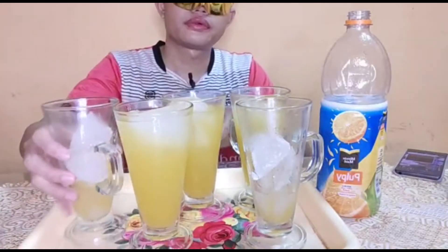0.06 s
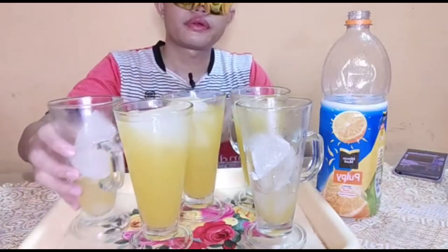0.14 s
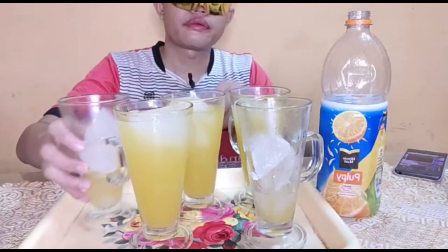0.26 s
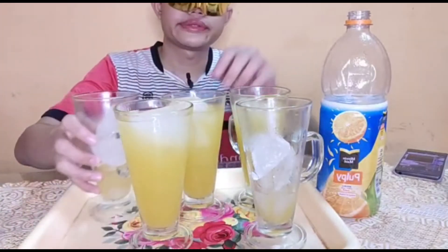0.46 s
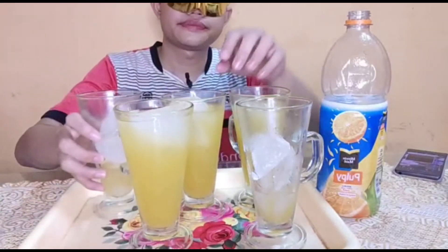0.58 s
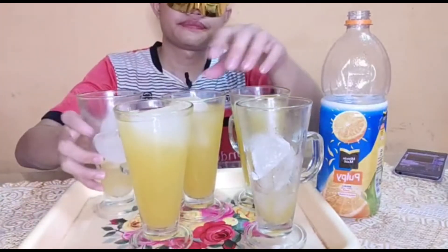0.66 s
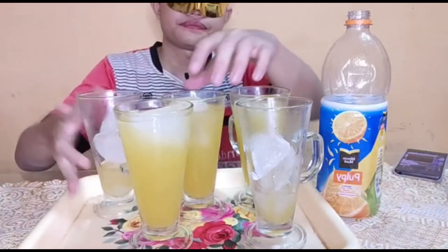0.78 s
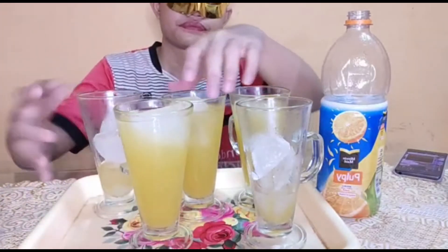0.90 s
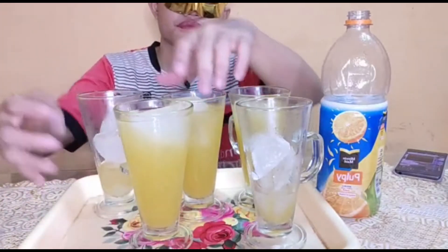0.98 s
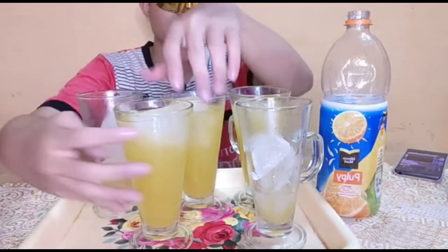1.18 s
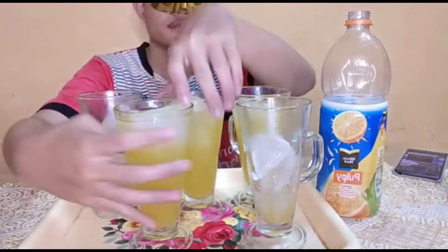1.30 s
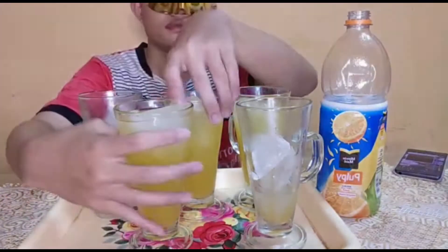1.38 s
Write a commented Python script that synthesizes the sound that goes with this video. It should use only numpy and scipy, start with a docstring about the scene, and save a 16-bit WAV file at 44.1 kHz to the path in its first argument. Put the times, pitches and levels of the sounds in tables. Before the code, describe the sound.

A glass mug of ice slides and clinks against another glass, then ice taps softly.

```python
"""A glass mug of ice, slid across a tray by hand, clinks and chatters against a neighbouring glass.
Each contact rings both, the held mug short and the free glass long, and shakes the tray beneath them.
The ice settles in small taps and pings, something light knocks, and sleeves rustle and click close by
as the arms move. Behind it all is a small, quiet room with a faint rumble and hiss."""
import sys
import numpy as np
from scipy import signal
from scipy.fft import rfft, irfft, next_fast_len
from scipy.io import wavfile
from scipy.ndimage import map_coordinates

SR = 44100
rng = np.random.default_rng(int(sys.argv[2]) if len(sys.argv) > 2 else 0)


def wav_out(sig):
    """Save sig, one row per channel (or a flat mono array), as 16-bit PCM at SR to the path in sys.argv[1]."""
    wavfile.write(sys.argv[1], SR, np.round(np.clip(np.atleast_2d(sig).T, -1, 1) * 32767).astype(np.int16))


N = 63945
T = np.arange(N) / SR

# The mug chatters on the glass. Each row: start in seconds, ring level in dB, clack level in dB.
CHATTER = [(0.2312, -11, -14), (0.242, -13, -11), (0.2474, -21, -19), (0.2534, -22.5, -16.5),
           (0.2585, -27.5, -25.5), (0.2573, -25.5, -38), (0.259, -38.5, -33.5), (0.264, -34.5, -31.5),
           (0.268, -36, -29), (0.2802, -56.5, -40)]
# What rings. Each row: pitch in Hz, relative level in dB, time to die by 60 dB (t60) in seconds.
MUG_MODES = [(911.6, -21.5, 0.069), (1512, -17.5, 0.06), (2664, 3, 0.033), (2616, -20.5, 0.18),
             (4393, -13.5, 0.078), (5435, -24.5, 0.031), (7094, -15, 0.016), (9220, -29.5, .04),
             (9820, -25, 0.053)]  # damped by the hand
GLASS_MODES = [(951, -31, .27), (1532, -34, .24), (2351, -30, .2), (2429, -31, .28), (2661, -17, .19),
               (2717, -22, .24), (4415, -25, .3), (4432, -31, .28), (5480, -40, .26), (6158, -38, .3),
               (7140, -42, .2), (9135, -42, .22), (9798, -43, .18), (9884, -45, .2), (14850, -56, .2)]  # standing free
TRAY_LOW_MODES = [(660, -35, .1), (752, -31, .14), (897, -28, .12), (1030, -32, .1), (1345, -31, .12)]  # shaken through the feet of the glasses
PLASTIC_MODES = [(1314, 0.5, 0.017), (1940, -10, 0.033), (2368, -0.5, 0.014), (2920, -12.5, 0.024)]
# Ice hits the mug. Each row: start in seconds, ring in dB, pitch in Hz, t60 in seconds, crack in dB.
ICE_TAPS = [(0.1994, -36, 2205, 0.015, -50), (0.5543, -44.5, 2220, 0.017, -55),
            (.6049, -37, 2130, 0.022, -51), (.6305, -37, 2190, 0.016, -51),
            (.6328, -42.5, 2130, 0.035, -52.5), (0.654, -71, 1770, 0.02, -46.5),
            (0.665, -52, 1660, .02, -49.5), (0.902, -54.5, 1873, 0.027, -60.5)]
# Lone notes. Each row: start in seconds, level in dB, pitch in Hz, t60 in seconds.
ICE_PINGS = [(.529, -63, 6100, 0.098), (.53, -72, 10120, .07), (.6049, -58.5, 2173, 0.38),
             (.633, -59.5, 5550, 0.046), (.6658, -62, 4380, .07), (1.1268, -47.5, 10060, 0.014),
             (1.1795, -48, 10020, 0.019)]  # tiny glassy after-rings
RESTING_NOTES = [(0.403, -51, 64, 0.16), (0.544, -60, 503.6, 1.0)]  # faint and low, as the mug comes to rest
# A plastic knock and its rebounds. Each row: start in seconds, ring level in dB, snap level in dB.
KNOCK_BOUNCES = [(1.0336, -35, -32), (1.0372, -51, -31), (1.0441, -49.5, -25)]
# Small clicks. Each row: start in seconds, level in dB, centre in Hz, half-width in octaves, t60 in seconds.
HANDLING_CLICKS = [(0.0295, -40.5, 1420, 0.48, 0.015), (0.0368, -40, 830, 0.55, 0.026),
                   (.0565, -46, 1500, 1.3, 0.014), (0.0695, -38, 889, .5, .012),
                   (.1195, -48, 4000, 1.5, 0.011), (0.402, -50, 1500, 1, .04), (.511, -55, 1180, .5, 0.059),
                   (0.5555, -47, 3300, 0.44, 0.014), (1.074, -55, 12080, 0.34, 0.018),
                   (1.0458, -44, 4500, 1, 0.025), (1.1245, -49, 2600, 0.4, 0.016),
                   (1.1268, -45, 7500, 0.44, .012), (1.2355, -49, 6900, 1, 0.011),
                   (1.245, -46.5, 2800, 0.62, .018), (1.2805, -43, 2250, .7, .025),
                   (1.331, -43, 1970, 0.28, 0.014)]
# Fader moves for the friction. Each row: time in seconds, level in dB.
SLIDE_FADER = [(0, -70), (.03, -56.5), (.08, -55), (.1, -47.5), (.14, -50.5), (.22, -51), (.32, -52.5),
               (.41, -56), (.46, -69), (.5, -71.5)]
SLEEVE_FADER = [(1.0, -74.5), (1.06, -63.5), (1.2, -66), (1.235, -58.5), (1.283, -51.5), (1.31, -56),
                (1.335, -52), (1.36, -60.5), (1.41, -59.5), (1.45, -63)]
# The tone of each hit and noise bed. Each row: frequency in Hz, relative level in dB.
CLACK_EQ = [(100, -19.5), (400, -13.5), (800, -9), (1500, 0), (2400, 9), (3000, -14.5), (3500, -14.5),
            (4200, 6), (5200, -18), (6800, -4.5), (8400, -26.5), (10000, -15.5), (12300, -19.5),
            (14000, -44.5)]
TRAY_EQ = [(100, -22), (400, -13), (850, 3.5), (1150, -1.5), (1600, 0), (2600, -4.5), (3500, -9.5),
           (7000, -15), (8500, -26.5), (10500, -28), (14000, -36.5)]
SLIDE_EQ = [(150, -0.5), (320, -4.5), (600, 1.5), (1100, -1.5), (1900, 0.5), (3200, -8), (5500, -17),
            (8400, -24.5), (15500, -26)]
CRACK_EQ = [(200, -5), (700, 13), (2000, -2.5), (3500, -2), (6000, -3.5), (8000, -10.5), (10000, -12.5),
            (15000, -32.5)]
SNAP_EQ = [(200, -16.5), (800, 2), (1400, -1), (3000, 0), (7000, -2), (12000, -2), (15500, -16)]
SLEEVE_EQ = [(200, -20), (700, -0.5), (1200, -1.5), (1900, 4.5), (3200, -9), (5000, -10.5), (8000, -20.5),
             (11500, -13.5), (14000, -19.5), (15600, -27.5)]
ROOM_TONE_EQ = [(10, -1), (22, 4.5), (40, -10), (76, -11.5), (120, -12), (180, -11), (240, -20), (360, -20),
                (490, -18), (680, -24), (1200, -31.5), (2000, -46), (2700, -45.5), (6500, -41.5),
                (7800, -33), (9000, -47.5), (15500, -48)]
# The room's decay. Each row: frequency in Hz, t60 in seconds.
ROOM_DECAY = [(200, 1), (1500, 0.22), (4000, 0.38), (12000, 0.38)]

CLACK_DB, GRIT_DB, TRAY_RATTLE_DB = 8, -7.5, -22  # trims on the clack level
WAVER_RAD, WAVER_PER_S = 0.28, 45
ATTACK_S, GRAIN_WIDTH_HZ = 0.0004, 2500
REVERB_DB, REVERB_BUILD_S = -17, 0.0071
ROOM_TONE_DB, TOP_HZ = -53.5, 15750


def clink():
    """Each contact rings both glasses, gives a hard gritty clack, and shakes the tray."""
    rings = [(s, db) for s, db, _ in CHATTER]
    clacks = [(s, db) for s, _, db in CHATTER]
    clack = amp(CLACK_DB) * struck(clacks, CLACK_EQ)
    grit = amp(GRIT_DB) * noise(CLACK_EQ) * topped_up(clacks, t60=0.01)
    tray_body = ring(clacks, TRAY_LOW_MODES)
    tray_rattle = amp(TRAY_RATTLE_DB) * noise(TRAY_EQ) * topped_up(clacks, t60=0.22)
    return ring(rings, MUG_MODES + GLASS_MODES) + clack + grit + tray_body + tray_rattle


def slide():
    """The mug's base scrapes over the tray."""
    return rub(SLIDE_FADER, SLIDE_EQ, grain_db=3.0, grains_per_s=330)


def ice():
    """Ice taps the mug, each tap a tiny crack and one short note, with glassy pings on top."""
    taps = notes(row[:4] for row in ICE_TAPS)
    crack_envelope = sum(amp(db) * fade(s, t60=0.02) for s, *_, db in ICE_TAPS)
    return taps + crack_envelope * noise(CRACK_EQ) + notes(ICE_PINGS)


def knock():
    """Light, hollow plastic bounces, with a crisp snap at each contact."""
    body = ring([(s, db) for s, db, _ in KNOCK_BOUNCES], PLASTIC_MODES)
    snap = struck([(s, db) for s, _, db in KNOCK_BOUNCES], SNAP_EQ)
    return body + snap


def clicks():
    """Dry clicks of handling, each a noise burst in its own broad resonance."""
    out = np.zeros(N)
    for s, db, hz, width, t60 in HANDLING_CLICKS:
        band = filtered(rng.standard_normal(N), lambda f: 1 / (1 + (np.log2((f + 1) / hz) / width) ** 2))
        out += amp(db) * fade(s, t60) * unit(band)
    return out


def sleeves():
    """Cloth rubs and rustles as the arms move."""
    return rub(SLEEVE_FADER, SLEEVE_EQ, grain_db=4.5, grains_per_s=360)


def reverb(x):
    """The small room's tail, in which the lows hang on longest."""
    hz, t, spectrum = signal.stft(rng.standard_normal(SR // 2), SR, nperseg=256)
    decay = np.exp(-np.log(1000) * t / along(ROOM_DECAY, hz)[:, None])
    tail = signal.istft(spectrum * decay, SR, nperseg=256)[1]
    tail *= 1 - np.exp(-np.arange(len(tail)) / SR / REVERB_BUILD_S)
    return signal.fftconvolve(x, tail / np.linalg.norm(tail))[:N]


def room_tone():
    """A steady bed of rumble and hiss."""
    return amp(ROOM_TONE_DB) * noise(ROOM_TONE_EQ)


def ring(blows, modes):
    """A struck body's slightly wavering modes, topped up by every blow."""
    age = T - blows[0][0]
    out = np.zeros(N)
    for hz, db, t60 in modes:
        phase = 2 * np.pi * hz * age + WAVER_RAD * wobble(WAVER_PER_S)
        out += amp(db) * topped_up(blows, t60) * np.sin(phase)
    return out


def struck(blows, eq):
    """One sharp transient per blow, coloured by a minimum-phase EQ."""
    size = 2048
    cepstrum = irfft(np.log(amp(along(eq, np.fft.rfftfreq(size, 1 / SR)))))
    pulse = irfft(np.exp(rfft(2 * cepstrum[:size // 2], size)))
    train = np.zeros(N)
    for s, db in blows:
        train[round(s * SR)] += amp(db)
    return signal.fftconvolve(train, pulse / np.linalg.norm(pulse))[:N]


def rub(fader, eq, grain_db, grains_per_s):
    """Friction noise whose short grains each favour their own frequencies."""
    hz, t, spectrum = signal.stft(noise(eq), SR, nperseg=128)
    grid = np.meshgrid(hz / GRAIN_WIDTH_HZ, t * grains_per_s, indexing="ij")
    grains = map_coordinates(rng.standard_normal((32, 2048)), grid, mode="wrap")
    rough = signal.istft(spectrum * amp(grain_db * grains), SR, nperseg=128)[1][:N]
    return amp(np.interp(T, *np.transpose(fader))) * unit(rough)


def notes(rows):
    """One dying sine per row."""
    return sum(amp(db) * fade(s, t60) * np.sin(2 * np.pi * hz * (T - s)) for s, db, hz, t60 in rows)


def topped_up(blows, t60):
    """Envelope of a ring to which each blow adds its energy."""
    return np.sqrt(sum((amp(db) * fade(s, t60)) ** 2 for s, db in blows))


def fade(start, t60):
    """A fast attack, then an exponential decay."""
    age = np.maximum(T - start, 0)
    return (1 - np.exp(-age / ATTACK_S)) * np.exp(-np.log(1000) * age / t60)


def noise(eq):
    """Noise through an EQ curve, at rms 1."""
    return unit(filtered(rng.standard_normal(N), lambda hz: amp(along(eq, hz))))


def filtered(x, response):
    """Shape x with a gain for each frequency."""
    size = next_fast_len(N + 8192)
    return irfft(rfft(x, size) * response(np.fft.rfftfreq(size, 1 / SR)), size)[:N]


def wobble(rate):
    """A smooth random curve, rate knots a second."""
    return map_coordinates(rng.standard_normal(4096), [T * rate], mode="wrap")


def along(curve, hz):
    """Read a curve on a log frequency axis."""
    knots_hz, values = np.transpose(curve)
    return np.interp(np.log(hz + 1), np.log(knots_hz + 1), values)


def amp(db):
    """Decibels to gain."""
    return 10 ** (np.asarray(db) / 20)


def unit(x):
    """Scale to rms 1."""
    return x / np.sqrt(np.mean(x ** 2) + 1e-20)


def scene():
    """The hits feed the reverb; the friction stays dry, over the room tone."""
    hits = clink() + ice() + knock() + clicks() + notes(RESTING_NOTES)
    friction = slide() + sleeves()
    return (hits + amp(REVERB_DB) * reverb(hits) + friction + room_tone())[None]


def record(dry):
    """A brick-wall high cut takes off the very top."""
    return filtered(dry[0], lambda hz: hz < TOP_HZ)[None]


dry = scene()
out = record(dry)
wav_out(out)
```